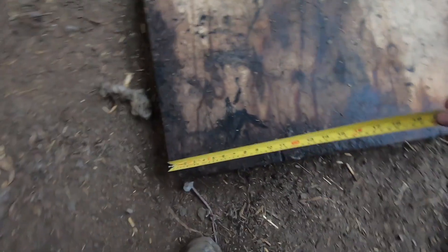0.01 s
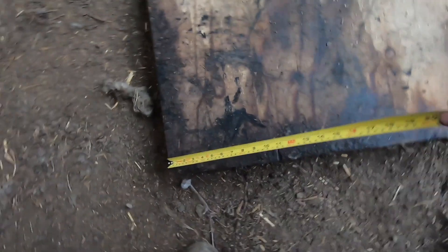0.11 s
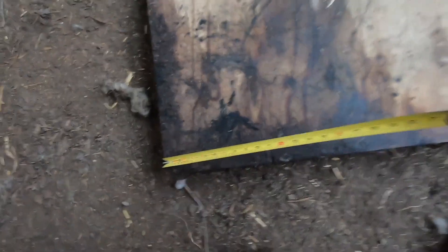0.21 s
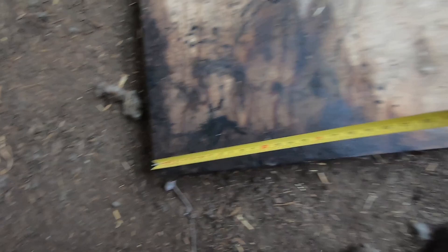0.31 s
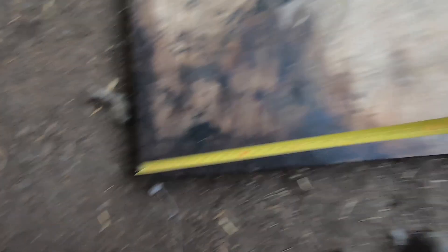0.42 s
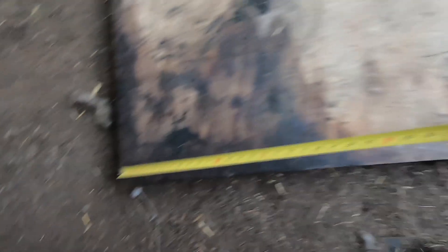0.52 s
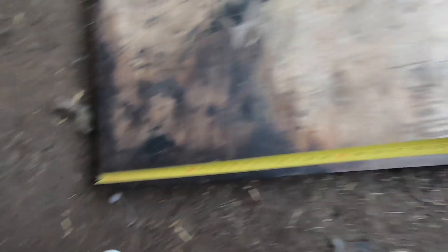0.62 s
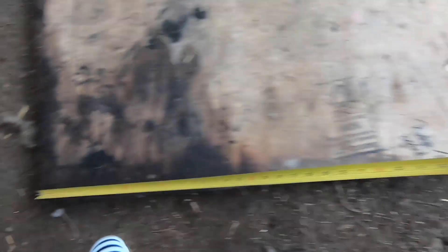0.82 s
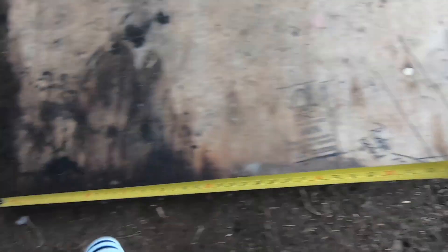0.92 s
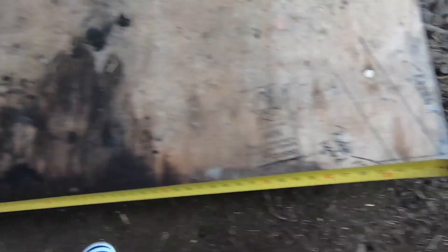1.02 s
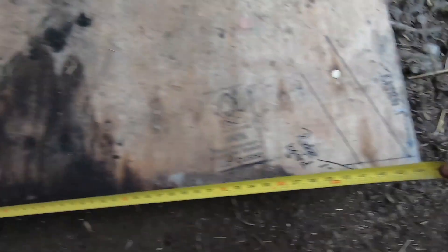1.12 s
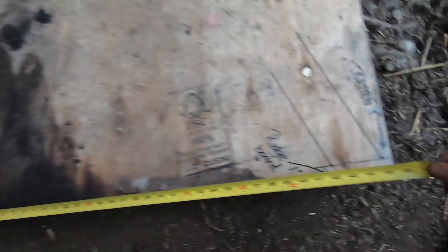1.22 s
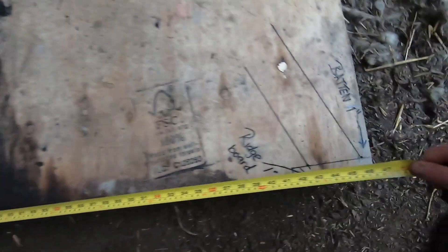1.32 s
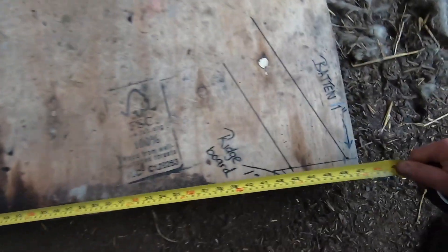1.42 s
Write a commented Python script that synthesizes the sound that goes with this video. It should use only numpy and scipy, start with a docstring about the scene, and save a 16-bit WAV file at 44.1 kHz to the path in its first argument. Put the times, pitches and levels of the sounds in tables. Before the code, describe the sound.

In a quiet shed, a tape measure's metal blade hisses out of its case, scraping a wooden board and giving one ringing thump. It keeps sliding, clicking as it flexes, while air softly bumps the microphone.

```python
"""A steel tape measure, hooked over the edge of a plywood sheet, is drawn out in a shed.
Air rumbles softly on the microphone as the blade starts to hiss through the mouth of its case.
Pulling taut, it scrapes and knocks on the board, loudest at about 0.4 s, and the wood rings.
Then it slides on, chafing on the case and giving short crinkling clicks when it flexes,
while its faint singing drops in pitch as the blade gets longer."""
import sys
import numpy as np
from scipy import signal
from scipy.fft import rfft, irfft
from scipy.io import wavfile
from scipy.ndimage import uniform_filter1d

SR = 44100
rng = np.random.default_rng(int(sys.argv[2]) if len(sys.argv) > 2 else 0)


def master_out(mix):
    """Clip the mix to full scale and print it as 16-bit PCM to the path in sys.argv[1]."""
    frames = np.transpose(np.atleast_2d(mix))
    ceiling = np.clip(frames, -1, 1)
    pcm = np.round(ceiling * 32767).astype(np.int16)
    wavfile.write(sys.argv[1], SR, pcm)


N = 63945
T, HZ = np.arange(N) / SR, np.fft.rfftfreq(N, 1 / SR)


def amp(db):
    """Turns decibels into a number to multiply by."""
    return 10 ** (np.asarray(db) / 20)


def unit(x):
    """Scales a signal to an average strength (rms) of 1."""
    return x / np.sqrt(np.mean(x ** 2) + 1e-20)


def over_hz(points):
    """Joins a table's points into a curve over frequency."""
    f, value = np.transpose(points)
    return np.interp(np.log(HZ + 1), np.log(f + 1), value)


def over_time(points):
    """Joins a table's points into a curve over time."""
    return np.interp(T, *np.transpose(points))


def bell(time, width):
    """A smooth rise and fall that peaks at the given time."""
    return np.exp(-.5 * ((T - time) / width) ** 2)


def low_pass(x, hz, order):
    """Turns down what lies above hz."""
    return irfft(rfft(x) / (1 + (HZ / hz) ** order), N)


def noise():
    """Two unrelated noises."""
    return rng.standard_normal((2, N))


def slips(per_s, spread_db):
    """Tiny slips at random moments, a few of them large."""
    ticks = np.sign(noise()) * (rng.random((2, N)) < per_s / SR)
    return ticks * amp(spread_db * np.minimum(rng.exponential(1, (2, N)), 3))


def flutter(rate_hz, depth_db):
    """A random, smooth wavering of level."""
    waver = irfft(rfft(rng.standard_normal(N)) * np.exp(-(HZ / rate_hz) ** 2), N)
    return amp(depth_db * unit(waver))


# How alike left and right sound: (frequency [Hz], likeness [-1 to 1])
LIKENESS = [(40, 0.29), (150, 0.82), (300, 0.76), (700, 0.38), (1400, 0.42), (3000, 0.62), (5000, 0.77),
            (6500, -0.12), (8500, -0.15), (11000, 0.23), (15000, -0.27)]
def stereo(pair, tone_db, pan_db=0, spread=1):
    """Shapes the tone of two unrelated signals and blends them into left and right, at strength 1."""
    a, b = rfft(pair)
    angle = spread * np.arccos(np.clip(over_hz(LIKENESS), -1, 1)) / 2
    mid, side = a * np.cos(angle), b * np.sin(angle)
    left, right = (mid + side) * amp(pan_db / 2), (mid - side) * amp(-pan_db / 2)
    return unit(irfft(np.array([left, right]) * amp(tone_db), N))


# Tone of the shed's still air: (frequency [Hz], level [dB])
AIR_TONE = [(20, 8), (110, -27), (230, -13.5), (400, -23), (750, -10.5), (1650, -16.5), (1870, -5),
            (2150, -19.5), (5000, -25.5), (8000, -22.5), (14000, -77)]
# Air bumping the microphone: (time [s], level [dB])
RUMBLE_LEVEL = [(0, -67), (.23, -77), (.27, -50), (.31, -86), (.4, -76), (.44, -49.5), (.49, -57),
                (.56, -77), (.63, -68), (.91, -71), (.95, -54.5), (1.02, -71), (1.21, -68), (1.3, -50.5),
                (1.37, -58.5), (1.44, -49)]
# Tone of that rumble: (frequency [Hz], level [dB])
RUMBLE_TONE = [(10, -4), (40, 13.5), (72, 4), (105, -2.5), (300, -16.5), (1000, -78)]
def air():
    """The quiet shed, and air rumbling on the moving microphone."""
    still = amp(-61.5) * stereo(noise(), over_hz(AIR_TONE), pan_db=-2.5)
    rumble = amp(over_time(RUMBLE_LEVEL)) * stereo(noise(), over_hz(RUMBLE_TONE))
    return still + rumble


def shed_echo(x, fade_s=0.12):
    """The walls send back a short tail of scattered echoes."""
    echoes = noise() * (T > .004) * amp(-60 * T / fade_s)
    return signal.fftconvolve(x, unit(echoes) / np.sqrt(N), axes=1)[:, :N]


# Drone of the board and case: (time [s], level [dB])
DRONE_LEVEL = [(0, -69.5), (.11, -62.5), (.19, -59), (.225, -47.5), (.27, -45.5), (.32, -56.5), (.4, -55),
               (.47, -52.5), (.56, -53), (.62, -57), (.67, -52), (.75, -62.5), (.9, -66.5), (.97, -56),
               (1.1, -67.5), (1.17, -56), (1.3, -65), (1.45, -65.5)]
# Tone of the drone: (frequency [Hz], level [dB])
DRONE_TONE = [(30, -34), (105, -37), (150, -0.5), (180, -3.5), (215, -4), (255, -2.5), (310, -6.5),
              (350, -12), (550, -12.5), (1000, -20), (3000, -40.5)]
def drone(hum_hz=177.6):
    """The sliding blade shakes board and case; one low note of the board swells briefly."""
    hum = amp(-54.5) * bell(time=0.782, width=0.047) * np.sin(2 * np.pi * hum_hz * T)
    return stereo(noise(), over_hz(DRONE_TONE)) * amp(over_time(DRONE_LEVEL)) + hum


# Notes the plywood rings at: (pitch [Hz], level [dB], time to fade by 60 dB [s])
BOARD_NOTES = [(49, -41, .25), (76.6, -26, 0.274), (178.5, -23.5, 0.18), (207, -20, 0.076),
               (256, -25, 0.27), (397, -20.5, 0.066), (547, -20, 0.048), (887, -27, 0.077),
               (990, -32, 0.035), (1127, -27, 0.039)]
def board_ring(t):
    """The plywood's ring, t seconds after a blow."""
    return sum(amp(db - 60 * t / fade) * np.sin(2 * np.pi * hz * t) for hz, db, fade in BOARD_NOTES)


# Notes the curved steel rings at: (pitch [Hz], width [Hz], boost [dB])
STEEL_NOTES = [(2400, 720, 2.5), (3623, 146, 9), (4383, 60, 12.5), (5630, 330, 7.5)]
def steel_db():
    """The blade boosts sound that lies near its own notes."""
    return sum(db / (1 + (2 * (HZ - hz) / width) ** 2) for hz, width, db in STEEL_NOTES)


# Rubs on the case: (peak time [s], width [s], level [dB])
CHAFES = [(.362, 0.011, -42.5), (0.588, 0.0045, -46), (.665, 0.046, -53), (1.36, 0.0095, -50.5),
          (1.425, 0.043, -49.5)]
# Tone of the rubbing: (frequency [Hz], level [dB])
CHAFE_TONE = [(1700, -25), (2300, -3), (3600, -3.5), (4700, -3.5), (7400, 4.5), (9000, -28)]
def chafes():
    """Bright, uneven rasps as the blade presses against the lip of its case."""
    level = sum(amp(db) * bell(time, width) for time, width, db in CHAFES)
    rasp = noise() * flutter(rate_hz=120, depth_db=2.5)
    return level * stereo(rasp, over_hz(CHAFE_TONE) + 0.4 * steel_db())


# Scrapes over the board's edge: (peak time [s], rise [s], fall [s], level [dB])
SCRAPES = [(.22, 0.011, 0.003, -52), (.235, 0.0029, .004, -43), (0.251, 0.0074, 0.0062, -42),
           (0.269, 0.011, 0.0095, -42), (0.44, 0.0099, 0.0069, -43)]
# Tone of the scrapes: (frequency [Hz], level [dB])
SCRAPE_TONE = [(40, -8), (110, -9), (170, -8), (250, 3), (500, 1), (950, 8), (1900, -4.5), (2800, -0.5),
               (4600, -3.5), (7000, -13), (14000, -30)]
def scrapes():
    """Coarse slips swell and fade as the blade drags on the wood, and set the board ringing."""
    level = sum(amp(db) * bell(time, np.where(T < time, rise, fall)) for time, rise, fall, db in SCRAPES)
    rasp = (slips(per_s=1600, spread_db=4.0) + 0.13 * noise()) * flutter(rate_hz=135, depth_db=2.5)
    contact = level * stereo(rasp, over_hz(SCRAPE_TONE), pan_db=-4)
    wood = signal.fftconvolve(contact.mean(0), unit(board_ring(T)) / np.sqrt(N))[:N]
    return contact + amp(-10) * wood


# Flexes of the blade:
# (time [s], level [dB], length [s], pitch [Hz], width [octaves], left minus right [dB])
CLICKS = [(0.1268, -41, 0.0019, 4400, 1.14, -4.5), (0.336, -40.5, 0.0049, 1020, 1.52, -12),
          (.597, -33.5, 0.0064, 2400, 1, -26), (0.6003, -30, 0.0031, 3070, 0.57, -2),
          (0.769, -48.5, 0.0024, 3450, 0.3, -5), (1.035, -48, 0.0025, 3370, 0.45, -12),
          (1.1455, -34, 0.0021, 3404, 0.55, -4), (1.15, -49, 0.0079, 3300, 0.42, 4),
          (1.2293, -49, 0.00051, 1640, 0.7, -2), (1.35, -47, 0.02, 4670, .17, -3)]
def click(time, db, length, hz, octaves, pan_db, fade_s=0.0019, ring_s=0.013):
    """The curved blade buckles: a short burst of chatter, then its notes ring briefly."""
    def band(f):
        return (1 + .5 * (np.log2((f + 1) / hz) / octaves) ** 2) ** -2
    t = np.maximum(T - time, 0)
    attack = 1 - np.exp(-t / (0.3 * length))  # shorter clicks start more sharply
    shape = attack * np.exp(-np.maximum(t - length, 0) / fade_s)
    chatter = shape * stereo(noise(), 20 * np.log10(band(HZ)) + steel_db(), pan_db, spread=0.92)
    notes = sum(band(f) * amp(boost) * np.sin(2 * np.pi * f * t) for f, _, boost in STEEL_NOTES)
    ring = notes * attack * amp(-15 - 60 * t / ring_s) * amp([[pan_db / 2], [-pan_db / 2]])
    return amp(db) * low_pass(chatter + ring, hz=8020, order=4)


# Knocks on the board: (time [s], level [dB], pitch [Hz], swell [s], puff against thump [dB])
KNOCKS = [(.130, -52, 708, 0.0088, -8), (.139, -48.5, 260, 0.0095, -8), (0.2444, -30, 222.5, 0.0069, -14),
          (0.4101, -40, 243, 0.0032, -11), (0.421, -17, 213, 0.0053, -12.5), (0.4425, -35, 223, 0.0075, 1),
          (0.472, -41.5, 207, 0.0061, -32), (0.936, -47.5, 152, 0.0058, -27)]
# Tone of the puff: (frequency [Hz], level [dB])
PUFF_TONE = [(60, 1), (200, 1), (400, 5), (560, -4.5), (750, -10), (1250, -6), (1700, -21), (4000, -27),
             (12000, -58)]
def knock(time, db, hz, swell, puff_db, puff_s=0.005):
    """The blade hits the board: a dull thump, a puff of noise, and the wood ringing on."""
    t = np.maximum(T - time, 0)
    thump = t / swell * np.exp(.5 * (1 - (t / swell) ** 2)) * np.sin(2 * np.pi * hz * t)
    puff = stereo(noise(), over_hz(PUFF_TONE), pan_db=-6, spread=0.28) * (T > time) * np.exp(-t / puff_s)
    ring = board_ring(t) * (1 - np.exp(-t / swell))
    return amp(db) * (thump + ring + amp(puff_db) * puff)


# The free blade's note: (time [s], pitch [Hz], level against the hiss [dB])
SINGING = [(0.148, 7240, -9), (.36, 6580, -16), (.55, 5800, -27), (.66, 5000, -8.5), (0.929, 4774, -11),
           (.99, 4640, -8), (1.04, 4060, -8), (1.299, 3910, -11.5), (1.45, 4100, -2.5)]
def sing(width_hz=280):
    """The free blade sings a fuzzy note that sinks as it gets longer."""
    time, hz, db = np.transpose(SINGING)
    note = np.exp(2j * np.pi * np.cumsum(np.interp(T, time, hz)) / SR)
    fuzz = low_pass(noise(), width_hz / 2, order=2) + 1j * low_pass(noise(), width_hz / 2, order=2)
    return unit((fuzz * note).real) * amp(np.interp(T, time, db)) * amp([[0], [-4]])  # softer on the right


# Loudness of the pull: (time [s], level [dB])
PULL_LEVEL = [(0, -85), (.11, -67), (.14, -62), (.195, -56.5), (.245, -45), (.36, -47), (.39, -45.5),
              (.47, -45), (.58, -41), (.62, -44), (.69, -42), (.76, -45.5), (.88, -45.5), (1.08, -48),
              (1.17, -46.5), (1.31, -49.5), (1.45, -53.5)]
# How fast the blade moves: (time [s], share of top speed [0 to 1])
SPEED = [(0, 0.13), (.17, 0.1), (.3, 0.73), (.6, 0.92), (.9, 0.9), (1.25, 0.86), (1.45, 0.73)]
# Tone of the hiss: (frequency [Hz], level [dB])
HISS_TONE = [(100, -35), (400, -18.5), (1000, -16), (1600, -12.5), (1950, -12.5), (2250, -8.5), (2900, -10),
             (3600, -7), (5000, -2), (6100, -0.5), (7400, 5), (8000, 1.5), (8700, -6), (10200, -3),
             (11500, -10.5), (13500, -14), (15000, -24)]
# Which side the hiss leans to: (frequency [Hz], left minus right [dB])
HISS_PAN = [(200, 19), (1200, -12), (2400, -5.5), (4500, -2), (7800, 1.5), (10000, -7), (14000, -7.5)]
def slide():
    """Countless tiny slips make the blade hiss as it leaves the case; faster sounds brighter."""
    ripple_db = 1.5 * unit(uniform_filter1d(rng.standard_normal((2, len(HZ))), size=70))
    tone_db = over_hz(HISS_TONE) + 0.22 * steel_db() + ripple_db  # ripple: the blade's many close notes
    hiss = stereo(slips(per_s=26000, spread_db=2), tone_db, over_hz(HISS_PAN))
    rasp = low_pass(hiss, hz=3140, order=6)
    fizz = hiss - low_pass(hiss, hz=7800, order=12)
    slowness = 1 - over_time(SPEED)  # a slow blade has more low rasp and less high fizz
    hiss = hiss + rasp * (amp(19.5 * slowness) - 1) + fizz * (amp(-10 * slowness) - 1)
    return (hiss + sing()) * amp(over_time(PULL_LEVEL)) * flutter(rate_hz=27, depth_db=1.08)


def scene():
    """Adds all the sounds together; the scrapes and clicks echo in the shed."""
    steady = slide() + chafes() + drone() + air()
    sharp = scrapes() + sum(click(*row) for row in CLICKS)
    return steady + sharp + amp(-8.5) * shed_echo(sharp) + sum(knock(*row) for row in KNOCKS)


def record(dry, low_hz=41, high_hz=14500):
    """The microphone and recorder lose the deepest bass and the highest treble."""
    thin = signal.lfilter(*signal.butter(1, low_hz, "high", fs=SR), dry)
    treble_cut = signal.firwin(301, high_hz, window=("kaiser", 9), fs=SR)
    return signal.oaconvolve(thin, treble_cut[None], "same")


dry = scene()
out = record(dry)
master_out(out)
```